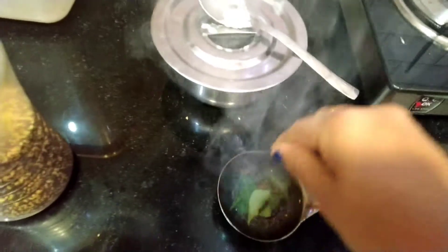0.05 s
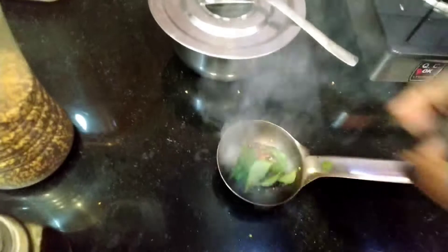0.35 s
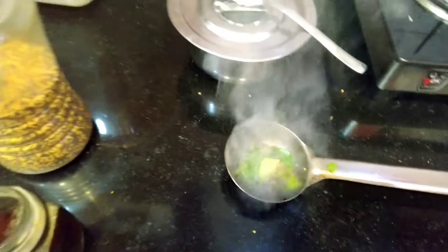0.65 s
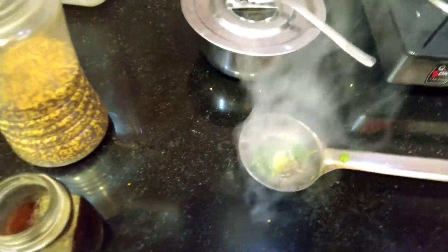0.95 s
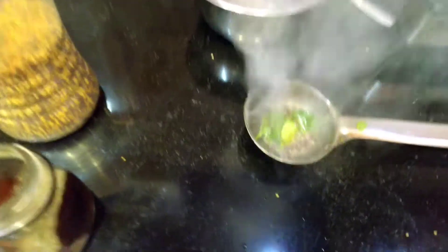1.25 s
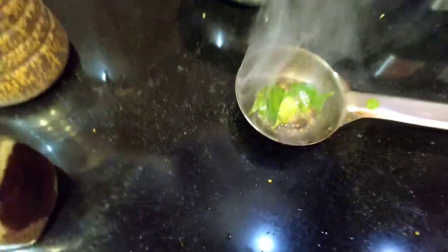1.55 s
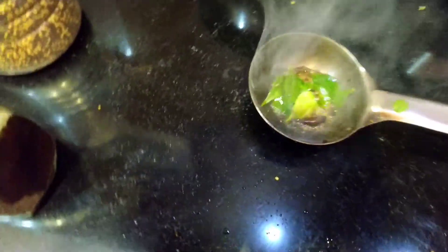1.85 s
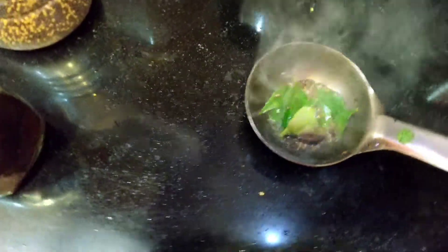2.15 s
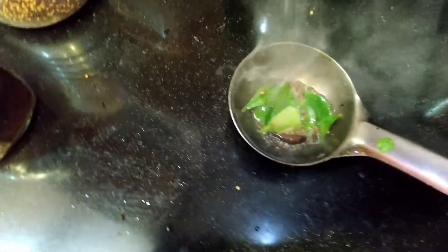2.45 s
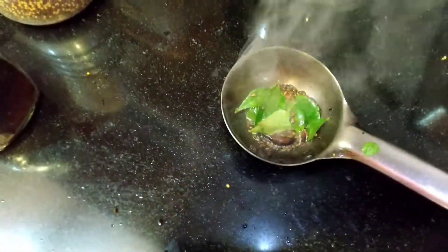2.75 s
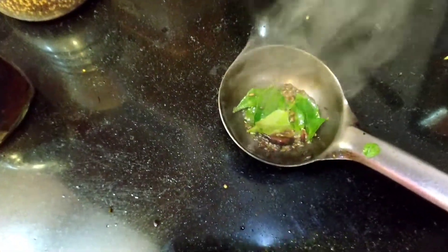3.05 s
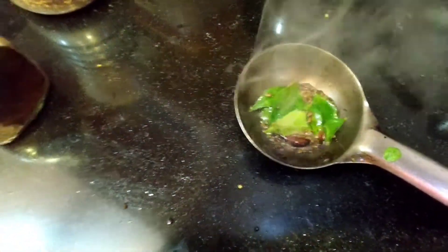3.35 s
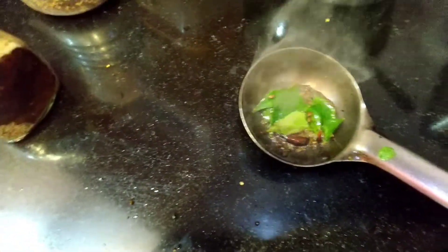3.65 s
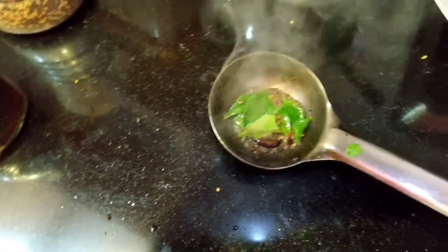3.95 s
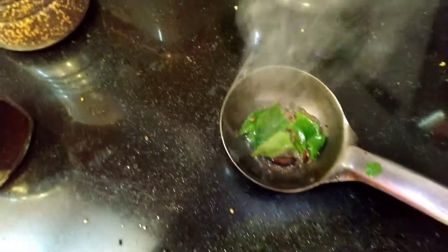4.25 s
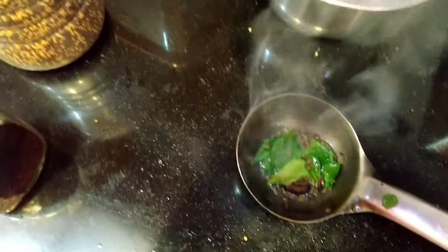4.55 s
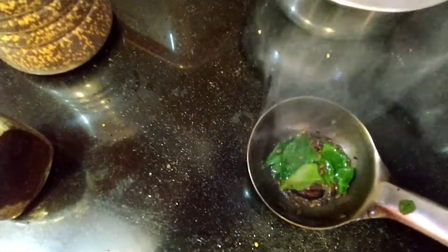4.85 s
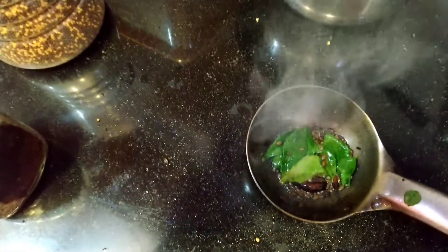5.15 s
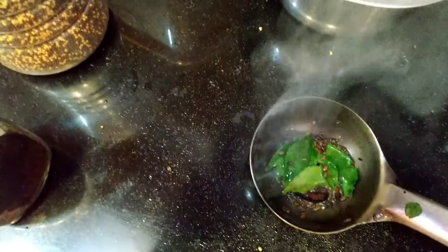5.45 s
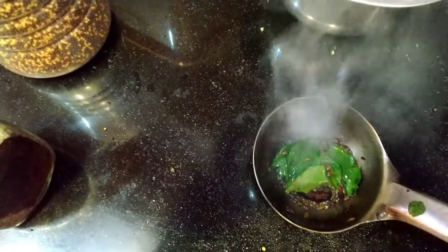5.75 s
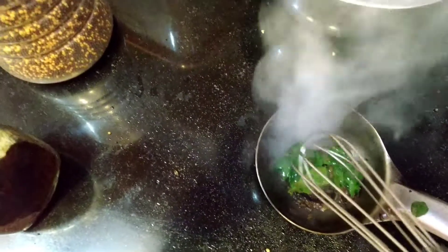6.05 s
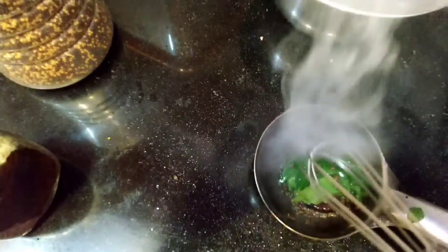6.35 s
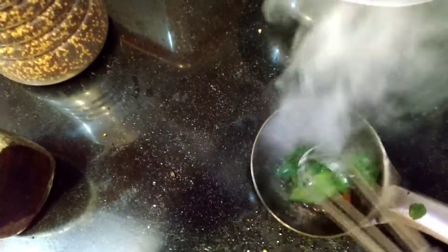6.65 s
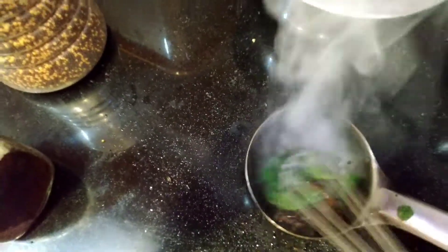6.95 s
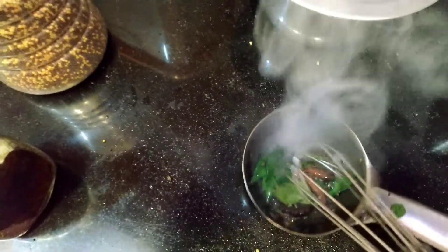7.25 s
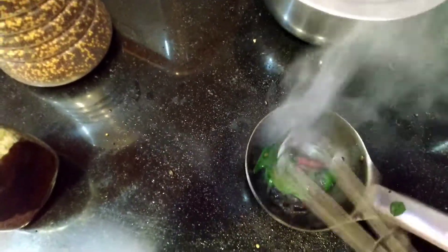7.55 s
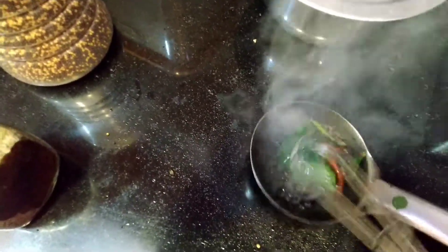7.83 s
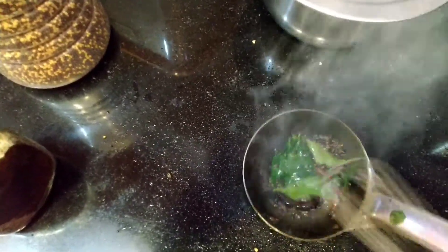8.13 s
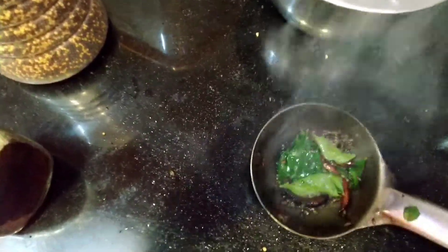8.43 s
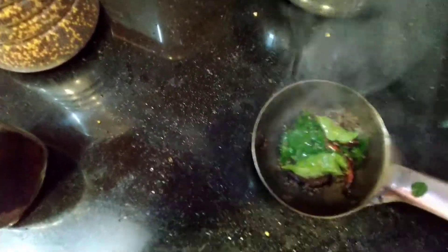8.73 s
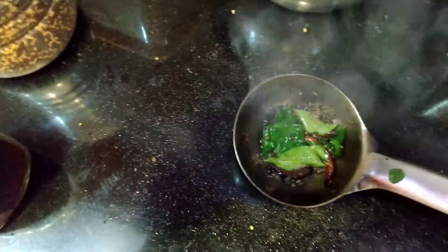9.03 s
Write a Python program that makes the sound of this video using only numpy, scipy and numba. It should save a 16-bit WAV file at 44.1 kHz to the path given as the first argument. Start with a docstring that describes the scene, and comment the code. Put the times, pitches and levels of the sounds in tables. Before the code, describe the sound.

Fresh leaves sizzle loudly in hot oil in a steel ladle, crackling and popping, with a few dull thumps of droplets hitting the microphone.

```python
"""Fresh leaves sizzle in hot oil in a steel ladle, close by in a small kitchen.
Their water boils off in clumps of bursting bubbles, each an impulse exciting a damped resonance,
with sharp pops between; stirring with a whisk revives the sizzle. The ladle's hollow resonates
and nearby surfaces reflect the sound. Now and then a flying droplet hits a microphone port
with a dull thump. A gas flame rushes softly underneath."""
import sys
import numpy as np
from scipy import signal
from scipy.fft import rfft, irfft
from scipy.io import wavfile
from scipy.ndimage import uniform_filter1d
from numba import njit

SR = 44100
rng = np.random.default_rng(int(sys.argv[2]) if len(sys.argv) > 2 else 0)


def materialize(psi):
    """Save the field psi as 16-bit PCM at rate SR to the path in sys.argv[1].

    A 1-D psi becomes a single channel; in a 2-D psi each row is a channel.
    """
    bounded = np.clip(np.atleast_2d(psi).T, -1, 1)
    quanta = np.round(bounded * 32767).astype(np.int16)
    wavfile.write(sys.argv[1], SR, quanta)


N = 409688


def from_db(db):
    """Amplitude ratio of a level in decibels."""
    return 10 ** (np.asarray(db) / 20)


def unit_rms(x):
    """Normalisation to an rms of 1."""
    return x / np.sqrt(np.mean(x ** 2) + 1e-20)


def panned(db):
    """Intensity panning: two gains for a left-minus-right level difference."""
    return unit_rms(from_db([[db / 2], [-db / 2]]))


def in_time(rows):
    """Linear interpolation of each column at every sample."""
    times, *columns = np.transpose(rows)
    return [np.interp(np.arange(N) / SR, times, c) for c in columns]


def at_hz(rows, hz):
    """Interpolation of each column on a logarithmic frequency axis."""
    points, *columns = np.transpose(rows)
    return np.array([np.interp(np.log(hz + 1), np.log(points), c) for c in columns])


def drift(corner_hz):
    """Random modulation: low-passed Gaussian noise of rms 1."""
    hop, settle = 20, 2000   # audio samples a step, steps discarded
    pole = np.exp(-2 * np.pi * corner_hz * hop / SR)
    noise = rng.standard_normal(N // hop + settle + 2)
    slow = signal.lfilter([1], [1, -2 * pole, pole * pole], noise)[settle:]
    return np.interp(np.arange(N) / hop, np.arange(len(slow)), unit_rms(slow))


def butter(x, hz, kind, order=2):
    """Butterworth filter, maximally flat in its passband."""
    return signal.sosfilt(signal.butter(order, hz, kind, fs=SR, output="sos"), x + 1e-18)


def ring(x, hz, q):
    """Damped resonator of quality factor q and unit peak gain."""
    w = 2 * np.pi * min(hz, .45 * SR) / SR
    damp = np.sin(w) / (2 * q)
    return signal.lfilter([damp, 0, -damp], [1 + damp, -2 * np.cos(w), 1 - damp], x + 1e-18)


@njit
def gliding_ring(x, w, q):
    """Damped resonator whose natural frequency w (radians a sample) varies in time."""
    out = np.zeros_like(x)
    for side in range(len(x)):
        state = 0j
        for i in range(len(w)):
            loss = w[i] / (2 * q)
            state = state * np.exp(1j * w[i] - loss) + 2 * loss * x[side, i]
            out[side, i] = state.real
    return out


def evened(x):
    """Division by the running rms of the mid signal: the slow level is held, fast crackle remains."""
    power = uniform_filter1d(x.mean(0) ** 2, SR // 12)
    return x / np.sqrt(np.abs(power) + 1e-12)


# Spectral density of the gas flame: f/Hz, relative level/dB
FLAME_SPECTRUM = [(18, -40), (30, -14), (81, 9), (290, -7), (467, 2), (600, -4), (780, -99), (1320, -120)]
def flame(level_db=-54.0, width=0.37):
    """Combustion noise: the burner's steady rush is random and mostly low in frequency."""
    shape = from_db(at_hz(FLAME_SPECTRUM, np.arange(N // 2 + 1) * SR / N))
    mid, side = irfft(rfft(rng.standard_normal((2, N))) * shape, N)
    return from_db(level_db) * (unit_rms(mid) + width * unit_rms(side) * np.array([[1], [-1]]))


def scatter(x, low_hz, high_hz):
    """Diffuse reverberation: each burst returns as noise whose energy decays exponentially."""
    power = (x ** 2).mean(0) + 1e-18
    energy = 0
    for db, t60_s in (-11.5, 0.012), (-12.0, 0.094):   # things close by, then the kitchen
        decay = from_db(-60 / (t60_s * SR)) ** 2
        energy = energy + from_db(db) ** 2 * signal.lfilter([1 - decay], [1, -decay], power)
    wash = butter(rng.standard_normal(x.shape), low_hz, "high", order=1)
    wash = butter(wash, min(high_hz, SR / 3), "low", order=1)
    return x + unit_rms(wash) * np.sqrt(energy)


# Echoes off the counter, jars and pots: left delay/s, right delay/s, level/dB
REFLECTIONS = [(.0027, .0021, -16.5), (.0046, 0.0065, -16), (.0083, .0071, -12.5), (0.013, 0.015, -10)]
def reflections(x, sway=0.0204, sway_hz=0.605):
    """Comb filtering by early reflections, whose delays shift as the hand-held microphone sways."""
    out, now = x.copy(), np.arange(N)
    for *delays, db in REFLECTIONS:
        stretch = np.exp(sway * drift(sway_hz))
        for side, delay_s in enumerate(delays):
            out[side] += from_db(db) * np.interp(now - delay_s * SR * stretch, now, x[side], left=0)
    return out


# Response from the ladle to the two microphone ports: f/Hz, left gain/dB, right gain/dB
PATH_RESPONSE = [(93, -33, 6.5), (460, -1.5, -2), (1000, -9.5, -3), (1660, -10, -7.5), (1770, -9.5, -3),
                 (2500, -5, -3), (3260, -6, -9), (4270, -6, -4.5), (4670, -7, -5), (6180, -9.5, -5),
                 (8000, -14, -13.5), (9470, -7, -5.5), (10300, -4.5, -1), (11460, -5, -4.5),
                 (13300, -5, -5), (14800, -5, -8.5)]
def path_to_ports(x, size=2048):
    """Minimum-phase filtering colours each path causally: nothing rings before a burst."""
    gains = from_db(at_hz(PATH_RESPONSE, np.arange(size // 2 + 1) * SR / size))
    cepstrum = irfft(np.log(gains))
    cepstrum[:, 1:] *= 2
    cepstrum[:, size // 2:] = 0
    impulse_response = irfft(np.exp(rfft(cepstrum)))
    return signal.oaconvolve(x, impulse_response, axes=1)[:, :x.shape[1]]


# The boil surges as the leaves go in, settles, revives under the whisk, dies down: t/s, level/dB
BOIL_LEVEL = [(0.0, -46), (0.04, -49), (0.08, -34), (0.18, -28.5), (0.215, -22.5), (0.42, -18.5),
              (0.9, -21.2), (1.9, -21.5), (2.7, -24.5), (3.3, -23), (3.75, -22), (4.0, -23.5),
              (4.45, -23.5), (4.9, -26), (5.55, -24.5), (5.68, -19.5), (6.95, -19), (7.95, -21),
              (8.18, -22), (8.23, -27.5), (9.29, -26.5)]
def boil_level():
    """Amplitude envelope of the boil, in dB, common to mist, steam and bubbles."""
    return in_time(BOIL_LEVEL)[0]


def mist(per_s=40.0, growth=3.0, reference_db=-22.5, level_db=-2.5, spread_db=5.0, apart_db=8.5):
    """Poisson impacts: oil mist patters on the ports in dry ticks, more often in a hard boil."""
    lands = rng.random(N) < per_s * from_db(growth * (boil_level() - reference_db)) / SR
    sizes = from_db(level_db + spread_db * np.clip(rng.standard_normal(N), -2, 2))
    sides = from_db(-apart_db * rng.random((2, N)))
    ticks = butter(lands * sizes * sides, 1300, "low", order=1)
    return butter(ticks, 130, "high", order=1)


# Droplet impacts: t/s, relative thump level/dB, relative tick level/dB, side (+ left, - right)
PORT_HITS = [(0.2736, -29, -37, -1.2), (0.3208, -28, -22, -.6), (0.3373, -23, -22, -0.48),
             (0.3472, -27, -20, -0.33), (0.377, -25, -19.5, -0.35), (0.4557, -29, -13, -0.45),
             (0.4666, -26, -13, -0.47), (1.082, -12.5, -22, 0.74), (1.121, -23, -20, 0.67),
             (1.3420, -34, -23, -1.6), (1.467, -19.5, -27, -1.3), (1.809, -26, -41, -1.4),
             (2.0302, -25, -46, -1.8), (2.0936, -21, -20, -1.3), (2.1685, -18.5, -31, 0.76),
             (2.2802, -30, -24, -.4), (2.441, -21.5, -47, -0.28), (2.6656, -23, -19, -0.81),
             (2.956, -23, -31, -1.2), (2.9886, -27, -35, -1.5), (3.0041, -27, -35, -1.3),
             (3.1450, -27.5, -23, -1), (3.9537, -26.5, -34, -1.3), (4.146, -27, -24, -1.2),
             (4.2233, -23.5, -30, 0.44), (4.2857, -30, -28, -1.5), (5.0820, -30.5, -31, -0.82),
             (5.238, -22.5, -44, -1), (5.7464, -25, -23, -1), (5.7776, -5.5, -10, 0.72),
             (5.7868, -28, -14, 0.42), (5.9120, -22.5, -43, 0.44), (6.1100, -22, -17, -0.72),
             (6.4018, -25.5, -19, -1), (6.5486, -13.5, -19, .6), (6.5877, -23, -37, 1),
             (6.6772, -23, -35, 1), (6.7574, -27.5, -35, -1.2), (6.918, -24.5, -41, -1.6),
             (7.1123, -28, -24, -1.4), (7.7648, -26, -21, -1.2), (7.9575, -27, -22, -1.4),
             (8.067, -28, -21, -0.85), (8.2131, -3, -29, 0.32), (9.1346, -22, -18, -1.3),
             (9.1876, -22, -17.5, -0.45)]
def droplets(apart_db=22, step_after_s=0.00035, splat_s=0.00086, size=512):
    """Step response: after a tick and a splat, a pressure step rings the microphone's bass cut."""
    steps, ticks, splats = np.zeros((3, 2, N + size))
    for s, thump_db, tick_db, port in PORT_HITS:
        at, gains = round(s * SR), panned(port * apart_db)
        ticks[:, at] += from_db(tick_db + 28.5) * gains[:, 0]
        steps[:, at + round(step_after_s * SR)] -= from_db(thump_db + 6.0) * gains[:, 0]
        splat = rng.standard_normal((2, size)) * np.exp(-np.arange(size) / (splat_s * SR))
        splats[:, at:at + size] += from_db(tick_db + 9.5) * gains * splat
    swings = butter(np.cumsum(steps, axis=1), 50, "high", order=6)
    thumps = butter(swings, 1100, "low", order=1)
    impacts = butter(butter(ticks, 2800, "low") + splats, 310, "high", order=1)
    return (thumps + impacts)[:, :N]


# Steam, strongest under the whisk: t/s, level relative to the boil/dB
STEAM_LEVEL = [(5.4, -22), (5.7, -13.5), (6.9, -14), (8.2, -17)]
def steam(edge_hz=13800):
    """High-passed flow noise: an airy hiss from the wet leaves."""
    hiss = butter(rng.standard_normal((2, N)), edge_hz, "high", order=4)
    return 2 * from_db(in_time(STEAM_LEVEL)[0]) * hiss


# Effect of how the leaves lie: t/s, then level/dB of fine bubbles, deep, middle and high modes
LEAF_COVER = [(0, -2, -7, -16, -12), (.7, -2, -11, -20, -19), (1.0, -2, -24, -18, -28),
              (2.9, -2, -15, -11.5, -25), (3.6, -3, -7.5, -11, -26), (4.2, -2.5, -10.5, -10, -20),
              (5.4, -2, -14, -4.5, -27), (5.8, -2.5, -22, -7, -7), (6.7, -2, -13, -7.5, -16),
              (7.3, -3.5, -10, -8, -14), (8.1, -3, -19, -12, -16), (8.5, -2, -9, -6, -17),
              (9.29, -3, -8, -12, -13)]
# Detuning by shifting leaves and the ladle's tilt: t/s, middle modes/semitones, high modes/semitones
MODE_BEND = [(0.4, .3, -.5), (2.4, 0.66, 0.15), (4.0, 0.26, -.4), (4.7, 0.071, .1), (5.9, -0.074, -0.039),
             (6.6, 0.14, -0.39), (7.5, -0.3, -.55), (8.6, 0.36, -0.15)]
# Modes of the ladle's hollow: f/Hz, bandwidth/Hz, level/dB
BOWL_MODES = [(573, 87, 2.5), (1880, 260, 2), (3460, 200, 3.5), (4164, 140, 7.5), (5610, 100, 4),
              (9800, 180, 12), (10560, 330, 10)]
def bowl(x, deep_below_hz=2500, high_from_hz=7000, patchy_db=4.0, patchy_hz=21.0,
         wander=0.0092, wander_hz=9.7):
    """Cavity resonance: bursts excite the ladle's modes, which the leaves open, close and detune."""
    _, deep_db, middle_db, high_db = in_time(LEAF_COVER)
    middle_bend, high_bend = in_time(MODE_BEND)
    modes = 0
    for hz, width_hz, db in BOWL_MODES:
        if hz < deep_below_hz:
            open_db, bend = deep_db, 0
        elif hz < high_from_hz:
            open_db, bend = middle_db, middle_bend
        else:
            open_db, bend = high_db, high_bend
        bent_hz = hz * 2 ** (bend / 12)
        w = 2 * np.pi * bent_hz / SR * np.exp(wander * drift(wander_hz))
        gain = from_db(db + open_db + patchy_db * drift(patchy_hz))
        modes = modes + gain * gliding_ring(x, w, hz / width_hz)
    return x + panned(-10.0) * modes


# Single loud bursts: t/s, relative onset level/dB, f/Hz, quality factor, left minus right/dB
WATER_POPS = [(0.009, -26.5, 2400, 2.2, -4), (0.0538, -24.5, 1930, 2.9, -3.5),
              (0.1137, -24.5, 2160, 3.4, -6), (0.1865, -19, 4230, 3, -14), (0.3498, -15, 4350, 1.1, 2),
              (0.457, -17, 6800, 1, -14), (0.506, -14, 4300, 0.71, -2), (0.5516, -20, 2300, 0.72, -10),
              (0.6961, -16.5, 3130, 0.38, -1), (0.7160, -14, 3500, 0.15, -4), (0.9091, -19, 2600, 0.23, 6),
              (1.1213, -20, 7400, 0.56, -15), (1.2119, -16.5, 5000, 0.14, 3), (1.4665, -20.5, 5130, 1.5, 0),
              (1.6523, -26, 11000, 0.77, -7), (1.7071, -24, 1200, 1.2, -1), (2.1546, -19, 5700, 0.42, -9),
              (2.2666, -21, 4700, 2.3, -7), (2.4221, -20, 10200, 1.8, -5), (2.442, -19, 9700, .7, -6),
              (2.529, -26.5, 1300, 3.5, -5), (2.537, -22.5, 2600, 0.74, -1),
              (2.6565, -21.5, 8000, 0.24, -4), (2.7175, -24, 4700, 2.5, -2), (2.7712, -8, 10500, 1.2, -11),
              (2.845, -16.5, 9740, 0.58, -13), (2.924, -19.5, 6360, 2.3, -5), (2.939, -25, 8000, .5, -1),
              (3.272, -26.5, 1250, 3.1, -6), (3.3957, -22, 5800, 2.8, -8), (3.426, -20.5, 1850, 0.66, 0),
              (3.739, -23.5, 1700, 1.3, -2), (3.745, -20.5, 2200, 1.3, -1), (3.873, -26, 1620, 4.1, -2),
              (3.9084, -19, 2600, 0.71, 1), (3.9538, -19, 9000, 0.68, 0), (3.9968, -23.5, 12000, 1.1, -2),
              (4.0665, -21, 10000, 1.3, -5), (4.4856, -25, 1920, 9, 0), (4.496, -23.5, 1880, 8.6, -2),
              (4.568, -20, 6000, 1.3, -4), (4.6658, -23.5, 2000, 0.43, -2), (4.6997, -20, 10300, 1.6, -3),
              (4.8922, -18, 2290, 1, -1), (0.6005, -26, 900, 0.39, -1), (5.159, -18, 8000, 0.56, 7),
              (5.202, -12, 10000, 0.37, 0), (5.238, -18, 9000, 0.65, 4), (5.371, -22, 9000, 0.5, 3),
              (5.3832, -22, 5300, 2, 12), (5.4687, -21, 3800, 0.75, -4), (5.614, -17, 9000, 0.66, -3),
              (5.681, -18, 10900, 0.89, 2), (5.6976, -19, 1400, 0.34, -2), (7.4222, -19, 9500, 0.73, 6),
              (8.1041, -20.5, 1700, 0.9, -6), (8.3054, -23, 3670, 3.7, -10), (8.4339, -24, 5350, 0.59, -6),
              (8.651, -23.5, 4250, 9.8, -7), (8.863, -18.5, 3820, 5.4, 2), (8.9462, -19.5, 10200, 1.2, -2),
              (8.9863, -24, 10400, 1.2, 2)]
def pops(crack=0.097, spray_db=-15.5, bounce_db=-13.5, bounce_s=0.001, gain_db=2.5, size=8192):
    """Explosive boiling of trapped water: a crack, a spray, a brief ring and a bounce off the steel."""
    out, t = np.zeros((2, N + size)), np.arange(size) / SR
    spray_decay = np.exp(-t / .001)
    for s, db, hz, q, pan_db in WATER_POPS:
        burst = (t == 0) + from_db(spray_db) * rng.standard_normal((2, size)) * spray_decay
        burst[:, round(bounce_s * rng.uniform(.6, 1.2) * SR)] += from_db(bounce_db)
        pop = ring(burst, hz, q) + crack / q * burst
        pop = path_to_ports(scatter(pop, hz / 2, hz * 2))
        pop /= pop[:, t < .003].std(axis=1, keepdims=True)   # the first 3 ms set the level
        at = round(s * SR)
        out[:, at:at + size] += from_db(db + gain_db) * panned(pan_db) * pop
    return out[:, :N]


# Pockets of water reaching the oil: t/s, duration/s, level above the boil/dB
WATER_FLARES = [(2.233, 0.034, 2), (2.366, 0.056, 1.5), (3.428, 0.23, 3), (4.074, 0.33, 3), (4.588, 0.1, 3),
                (4.76, 0.056, 2.5), (5.007, 0.24, 3.5), (5.315, .08, 3), (5.473, 0.024, 3),
                (8.467, 0.16, 2), (8.773, 0.068, 2)]
def flares(attack_s=0.012, release_s=0.03):
    """Trapezoidal envelopes, in dB: each flare rises, holds and falls back to the boil."""
    t = np.arange(N) / SR
    rise_db = 0
    for s, length_s, db in WATER_FLARES:
        ramps = np.minimum((t - s) / attack_s, (s + length_s - t) / release_s)
        rise_db = rise_db + db * np.clip(ramps + .5, 0, 1)
    return rise_db


def sputter(boil_db, depth_db=1.26, rate_hz=10.6, gentle_db=-27.0, smoothing=0.78):
    """Random level fluctuation, in dB, deepest when few pockets of water feed a gentle boil."""
    gentleness = np.minimum(from_db(smoothing * (gentle_db - boil_db)), 1.3)
    return depth_db * gentleness * drift(rate_hz)


def bubbles(per_s, low_hz, high_hz, q, spread_db, max_spreads, pan_db, echo=0.66, pitches=12):
    """Shot noise: bubbles burst at random, each a ringing click with its own bounce off the steel."""
    max_lag = 80   # samples
    born = np.flatnonzero(rng.random(N) < per_s / SR)
    sizes_db = spread_db * np.minimum(rng.exponential(1, N), max_spreads)
    sizes = from_db(sizes_db) * rng.choice([-1, 1], N)
    pitch_index = rng.integers(0, pitches, N)
    bounce_lag = rng.integers(max_lag // 4, max_lag, (2, N))
    out = np.zeros((2, N))
    for k, hz in enumerate(np.geomspace(low_hz, high_hz, pitches)):
        clicks = np.zeros((2, N + max_lag))
        at = born[pitch_index[born] == k]
        for side, lag in enumerate((0, k % 5 - 2)):   # arrival times differ between the ports
            clicks[side, at + lag] = sizes[at]
            clicks[side, at + bounce_lag[side, at]] += echo * sizes[at]
        out += panned(pan_db * (-1) ** k) * ring(clicks[:, :N], hz, q)
    return evened(path_to_ports(scatter(out, low_hz, high_hz)))


# Coarse crackle of large bubbles: t/s, level/dB
CRACKLE_LEVEL = [(0.0, -39.5), (0.28, -35), (0.4, -28), (0.95, -33.5), (1.7, -33), (2.85, -37.5),
                 (3.7, -33), (4.1, -36.5), (4.5, -33.5), (5.3, -35), (6.9, -38), (7.2, -31.5), (8.1, -30),
                 (8.3, -35.5), (8.6, -30.5), (9.29, -38.5)]
def sizzle(hard_boil_db=-24.0, strong_crackle_db=-31.0, clump_db=2.0, clump_hz=80.0):
    """Superposition of bursts sharing surges of steam: dense ones merge to hiss, sparse ones crackle."""
    boil_db = boil_level()
    vigour_db = np.maximum(boil_db - hard_boil_db, -4)
    boil_db = boil_db + flares() + sputter(boil_db)
    crackle_db = in_time(CRACKLE_LEVEL)[0] + 2.5 * drift(corner_hz=12.8)
    excess_db = crackle_db - strong_crackle_db
    fine_db = in_time(LEAF_COVER)[0]
    busy = from_db(1.25 * vigour_db + clump_db * drift(clump_hz))
    crowded = busy * from_db(excess_db)   # a strong crackle is also a dense one
    spits = bubbles(700 * busy, 630, 1400, q=0.34, spread_db=7, max_spreads=2.4, pan_db=2.5, echo=0.31)
    large = bubbles(1500 * crowded, 1190, 2400, q=3.7, spread_db=5, max_spreads=3.5, pan_db=10.5)
    middle = bubbles(1500 * busy, 2680, 6800, q=2.95, spread_db=3.5, max_spreads=3.36,
                     pan_db=12, echo=0.44)
    fine = bubbles(6500 * busy, 7000, 15000, q=5, spread_db=5.5, max_spreads=4.27, pan_db=9)
    # a few bursts are so abrupt that they are broadband; they stand out in a gentle boil
    snaps = bubbles(130 * busy, 2400, 10600, q=1.16, spread_db=2, max_spreads=1.7, pan_db=15, echo=0.4)
    snaps *= from_db(-5.5 - 0.43 * vigour_db)
    spits *= from_db(-9.5 + np.maximum(excess_db, 0))   # deep spits grow with a strong crackle
    middle_share = np.sqrt(np.clip(1 - from_db(fine_db) ** 2, .1, 1))
    fizz = from_db(0.6) * middle_share * middle + from_db(fine_db + 1.33) * fine + snaps
    crackle = from_db(crackle_db - 6.0) * (large + spits)
    return from_db(boil_db - 6.5) * fizz + crackle + from_db(boil_db) * steam()


def scene():
    """Linear superposition: the ladle with its echoes, oil striking the ports directly, the flame."""
    return reflections(bowl(sizzle() + pops())) + droplets() + mist() + flame()


def gain_control(x, threshold_db=-10.0, slope=0.67, release_db_per_s=90.0, attack_s=0.00061):
    """Dynamic compression: a loud hit ducks the gain, which recovers at a steady rate in dB."""
    power = uniform_filter1d((x ** 2).max(0), size=128)
    level_db = 10 * np.log10(np.abs(power) + 1e-12)
    wanted_db = slope * np.maximum(level_db - threshold_db, 0)
    release_db = release_db_per_s * np.arange(N) / SR
    duck_db = np.maximum.accumulate(wanted_db + release_db) - release_db
    pole = np.exp(-1 / (attack_s * SR))
    return x * from_db(-signal.lfilter([1 - pole], [1, -pole], duck_db))


def record(dry):
    """Compression, soft saturation of the peaks and steep band limiting."""
    ceiling, cutoff_hz = .95, 15570
    rounded = ceiling * np.tanh(gain_control(dry) / ceiling)
    low_pass = signal.ellip(10, .1, 80, cutoff_hz, fs=SR, output="sos")
    return signal.sosfilt(low_pass, rounded)


dry = scene()
out = record(dry)
materialize(out)
```